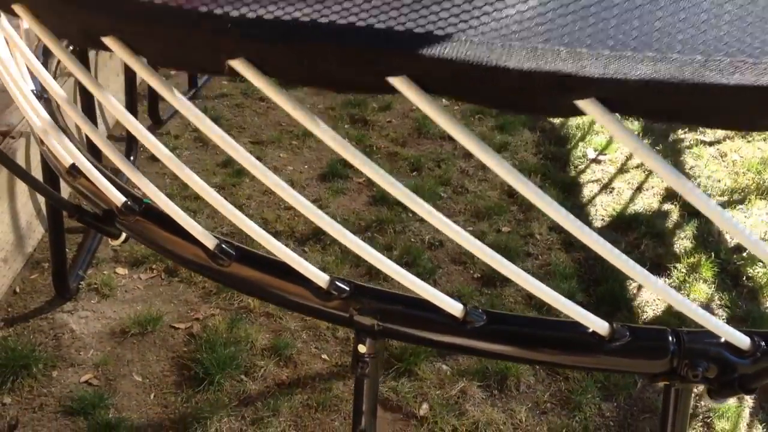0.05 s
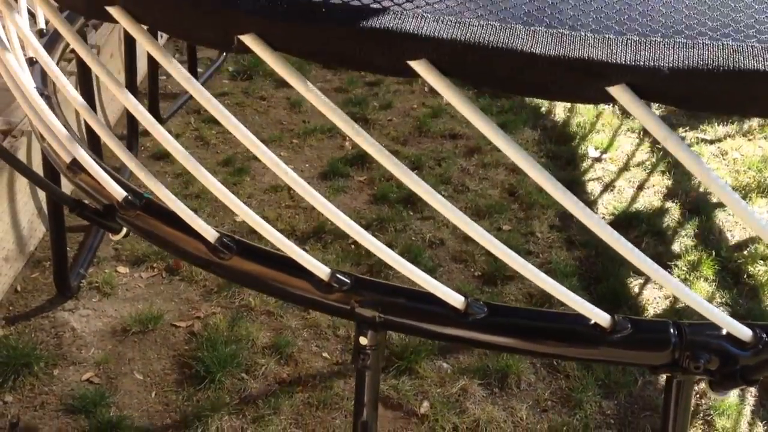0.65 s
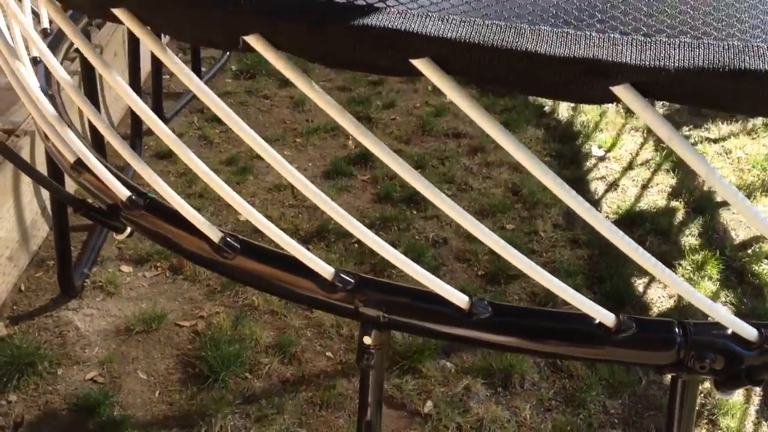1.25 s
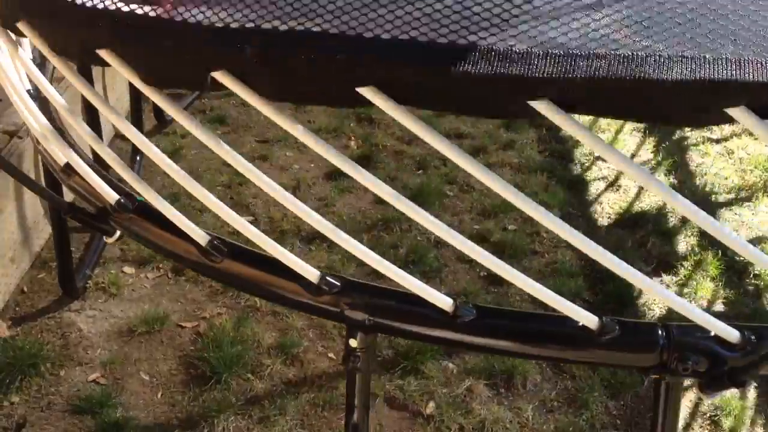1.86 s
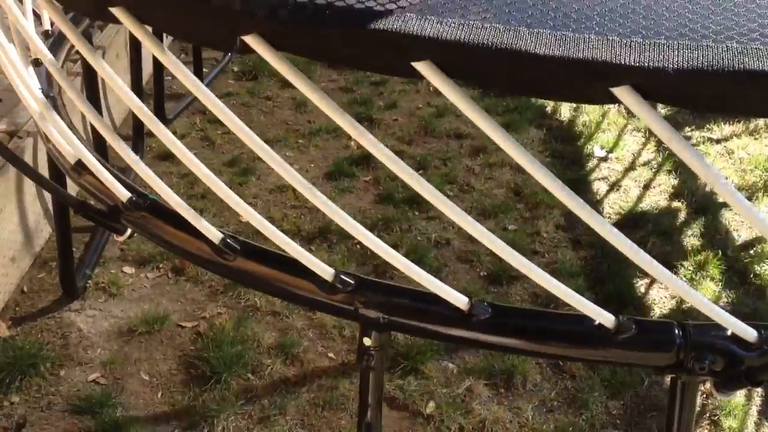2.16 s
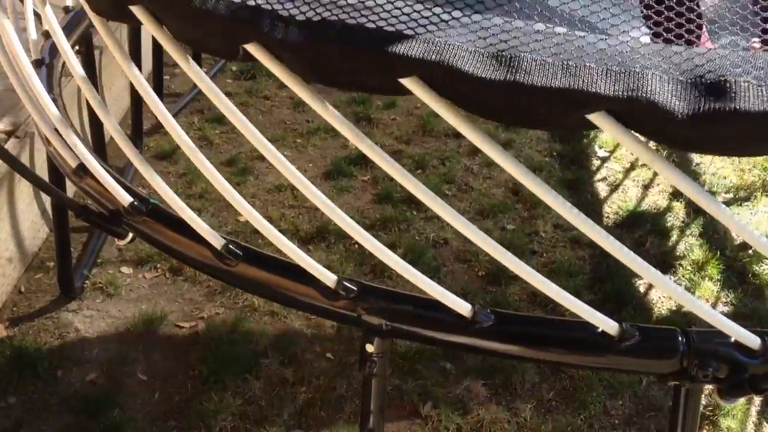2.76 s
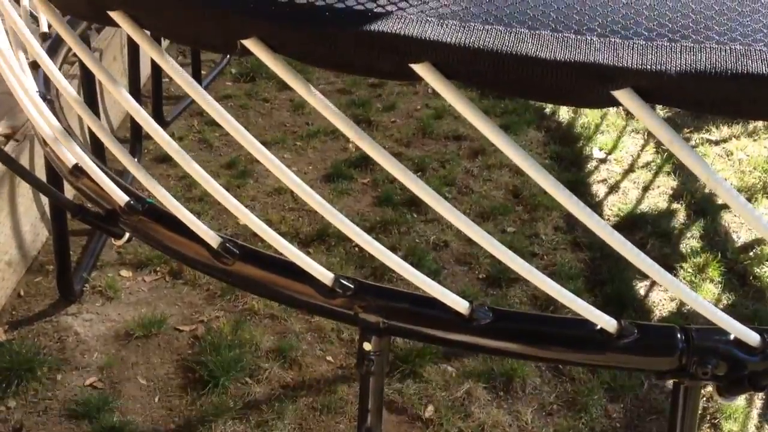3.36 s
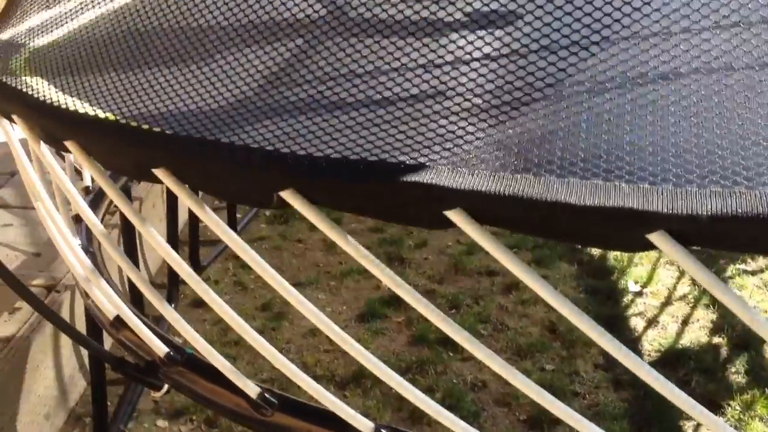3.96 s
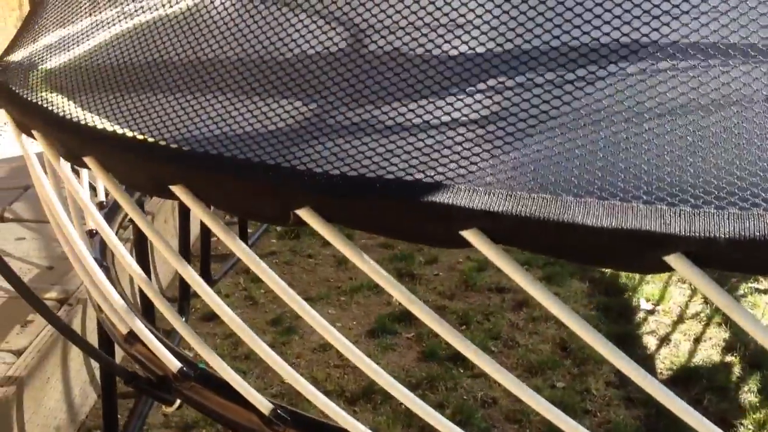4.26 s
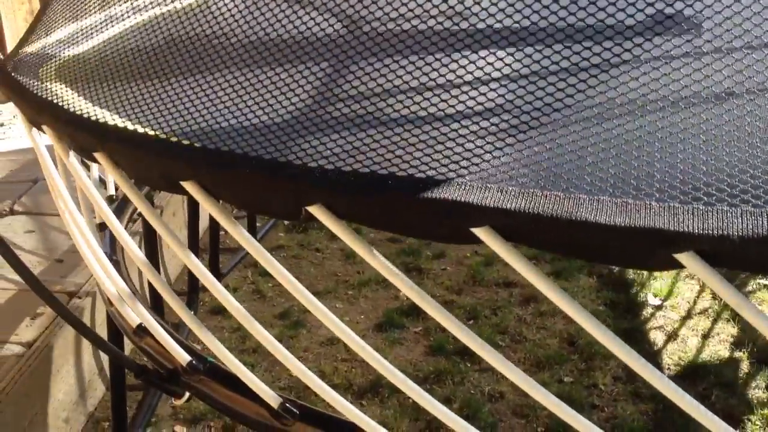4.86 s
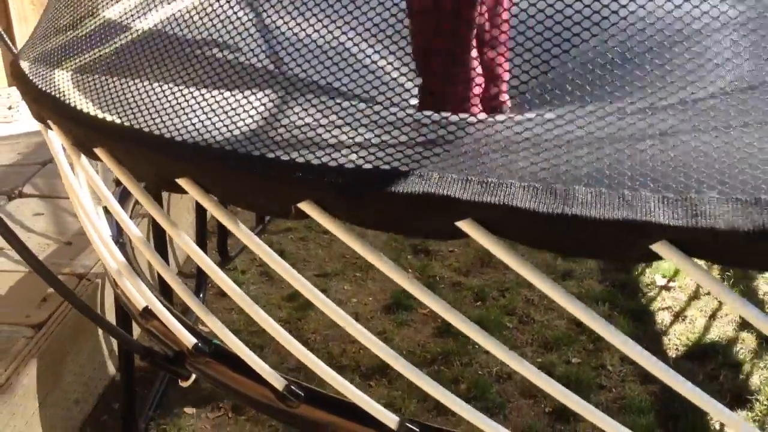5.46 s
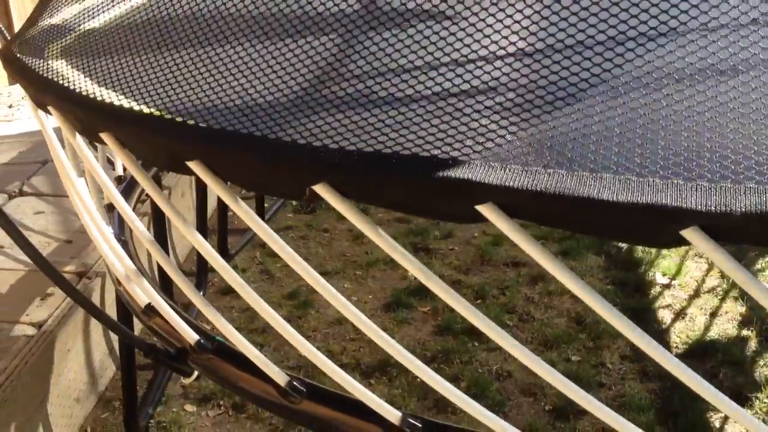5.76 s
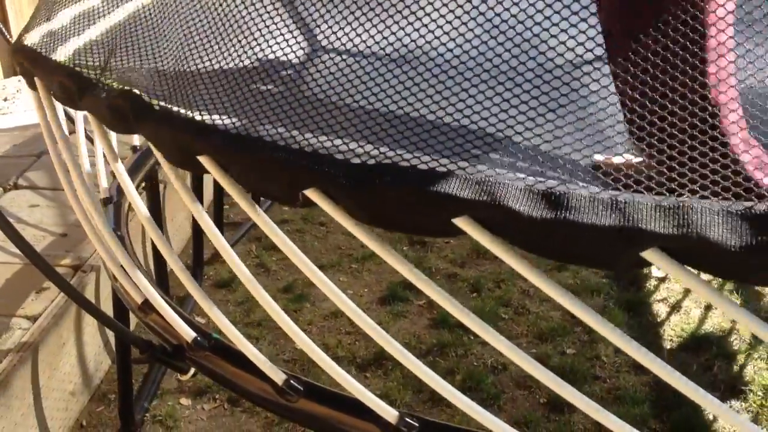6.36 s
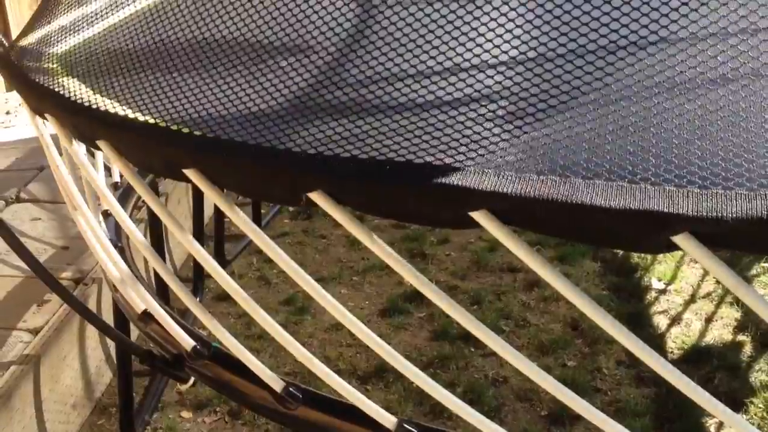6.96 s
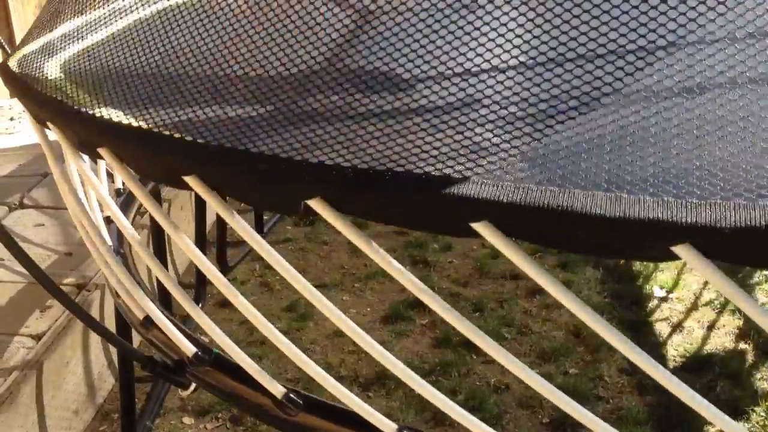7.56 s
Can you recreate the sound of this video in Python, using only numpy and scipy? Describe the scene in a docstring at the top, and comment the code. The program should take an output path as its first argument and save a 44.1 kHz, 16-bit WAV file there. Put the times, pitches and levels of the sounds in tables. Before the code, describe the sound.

Someone bounces on a backyard trampoline, with dull thuds, swishing mat and sharp metallic clanks from the frame, while faint birds chirp.

```python
"""A back yard, beside a rod-sprung trampoline on which someone bounces. Each landing thuds and
stretches the mat, whose fibres swish by friction and whose edge creaks by stick-slip. A loose joint
excites the modes of the steel frame, clanking as the load comes on and again as it lifts. The rods
tick, knock and squeak in their sockets. Small birds sing far off, over a hush and a fan's drone."""
import sys
import numpy as np
from scipy import signal
from scipy.fft import rfft, irfft
from scipy.io import wavfile

SR = 44100
rng = np.random.default_rng(int(sys.argv[2]) if len(sys.argv) > 2 else 0)


def transcribe(u):
    """Save the signal u as a 16-bit wav file named by the first command-line argument.

    u: samples, shape (n,) or (channels, n), limited to [-1, 1]; the rate is SR.
    q: integer samples, one column per channel.
    """
    v = np.clip(np.atleast_2d(u).T, -1, 1)
    q = np.round(v * 32767).astype(np.int16)
    wavfile.write(sys.argv[1], SR, q)


N = 335601
T = np.arange(SR // 2) / SR  # time in seconds within one impact

# The bounces. Each row: landing, time on the mat and time for the cloth to tighten, all in seconds,
# then the levels in dB of thump, slap, swish of the weave and rustle of the edge.
BOUNCES = [(0.063, 0.43, 0.0048, -43, -50.5, -53.5, -58), (0.812, 0.52, 0.055, -56.5, -58.5, -59.5, -64),
           (1.755, 0.44, 0.006, -44, -51, -53, -58), (2.555, 0.48, 0.011, -50.5, -55, -58.5, -68),
           (3.5, 0.48, 0.23, -45, -56, -53, -59), (4.274, 0.53, 0.034, -59, -62.5, -62.5, -63),
           (5.198, 0.49, 0.23, -59, -62.5, -58.5, -60.5), (6.155, 0.52, 0.034, -51.5, -56, -61, -62.5),
           (7.111, 0.5, 0.043, -52, -57, -55, -57.5)]


def amp(db):
    return 10 ** (np.asarray(db) / 20)


def unit_rms(x):
    return x / np.sqrt(np.mean(x ** 2) + 1e-20)


def add(mix, start, sound):
    part = mix[round(start * SR):][:len(sound)]
    part += sound[:len(part)]


def coloured(x, points):
    """Spectral shaping by a curve of (Hz, dB) points, scaled to unit rms."""
    hz, db = np.transpose(points)
    bins_hz = np.fft.rfftfreq(len(x), 1 / SR)
    gain = amp(np.interp(np.log(bins_hz + 1), np.log(hz), db))
    return unit_rms(irfft(rfft(x) * gain, len(x)))


def band(x, lo, hi, order=3):
    return signal.sosfilt(signal.butter(order, [lo, hi], "band", fs=SR, output="sos"), x)


def drift(n, per_s):
    """Random modulation: straight lines between Gaussian values."""
    knots = rng.standard_normal(4096)
    return np.interp(np.arange(n) * per_s / SR % 4095, np.arange(4096), knots)


def by_band(x, bands, levels_db):
    """A filter bank sets the level of an impact's first 25 ms in each band."""
    parts = [band(x, lo, hi) for lo, hi in bands]
    return sum(amp(db) * part / np.std(part[:SR // 40]) for part, db in zip(parts, levels_db))


def burst(rise, t60):
    """An attack, then exponential decay by 60 dB in t60 seconds."""
    return np.minimum(T / rise, 1) ** 0.65 * amp(-60 * np.maximum(T - rise, 0) / t60)


def ringing(modes, rise, scatter_db):
    """Superposition of damped modes; each blow shares its force among them differently."""
    chance = rng.standard_normal((len(modes), 2))
    return sum(amp(db + scatter_db * share) * burst(rise, t60) * np.sin(2 * np.pi * hz * T) * np.sign(side)
               for (hz, db, t60), (share, side) in zip(modes, chance))


def yard(hush_db=-67.5, drone_db=-68):
    """Broadband outdoor noise swells a little; a far-off fan adds a narrow-band drone."""
    # Spectrum of the hush. Each row: frequency in Hz, relative level in dB.
    spectrum = [(15, -75), (25, -52), (101, -14.5), (129, -11.5), (204, -14.5), (233, -1.5), (260, -7.5),
                (445, -18), (1080, -15.5), (1570, -35), (1710, -31.5), (4500, -27), (5580, -38),
                (7700, -39), (15500, -41)]
    hush = coloured(rng.standard_normal(N), spectrum) * amp(hush_db + 0.7 * drift(N, 2.7))
    drone = unit_rms(band(rng.standard_normal(N), 225, 247, order=2))
    return hush + amp(drone_db) * drone


def thuds():
    """Feet strike a heavily damped membrane: a slower push lasts longer, with a little scuff on top."""
    # Short dull thuds: a second foot, the load shifting, or the sharp start of a landing.
    # Each row: start in seconds, level in dB.
    short_thuds = [(0.129, -47), (0.363, -46), (0.871, -60.5), (0.906, -62), (1.797, -41.5), (1.827, -48),
                   (2.064, -42.5), (3.523, -52), (3.555, -58), (3.837, -43.5), (4.425, -51), (5.238, -67),
                   (5.534, -47.5), (6.204, -60), (6.426, -56.5), (7.114, -52.5)]
    # Bands of thump, slap and scuff. Each row: lower and upper edge in Hz.
    bands = [(120, 350), (350, 1100), (1100, 3500)]
    landings = [(start, 0.011, thump, slap, slap - 2.5) for start, _, _, thump, slap, _, _ in BOUNCES]
    short = [(start, 0.0052, db, db - 7.5, db - 13) for start, db in short_thuds]
    out = np.zeros(N)
    for start, rise, *levels_db in landings + short:
        push, scuff = rng.standard_normal((2, len(T)))
        push = coloured(push, [(40, -16), (200, 14), (700, 2), (2000, -9), (8000, -74)])
        blow = push * burst(rise, t60=12 * rise) + amp(-7) * scuff * burst(rise, t60=0.46)
        add(out, start, by_band(blow, bands, levels_db))
    return out


def stretching(slack=0.38, release_share=0.13, creep=0.14, settle_s=0.064):
    """Envelopes of swish and rustle: a mass on a spring sinks and lifts in half a sine each bounce."""
    swish, rustle = np.zeros((2, N))
    for start, length, tighten, _, _, swish_db, rustle_db in BOUNCES:
        t = np.arange(int(length * SR)) / SR
        phase = np.pi * (t / length) ** 0.99
        depth, speed = np.sin(phase), abs(np.cos(phase))
        taut = slack + (1 - slack) * np.minimum(t / tighten, 1)
        contact = taut * np.minimum((1 - t / length) / release_share, 1)
        crumple = 1 + np.exp(-t / 0.015)  # strongest on landing
        add(swish, start, amp(swish_db) * taut * depth ** 0.67 * (creep + speed))
        add(rustle, start, amp(rustle_db) * contact * crumple)
    pole = np.exp(-1 / (settle_s * SR))  # the cloth comes to rest gradually
    return [np.maximum(level, signal.lfilter([1 - pole], [1, -pole], level)) for level in (swish, rustle)]


def mat(swish, rustle, rest_swish_db=-76, rest_rustle_db=-67.5):
    """Friction noise: fibres slide and the padded edge crumples; even the empty mat stirs faintly."""
    # Spectra of the weave and of the edge. Each row: frequency in Hz, relative level in dB.
    weave_spectrum = [(900, -13), (2200, -1.5), (3200, -1), (4700, 2), (6300, -0.5), (10400, -3.5),
                      (15000, -12.5)]
    edge_spectrum = [(40, -44), (90, -13.5), (150, 11.5), (300, 3.5), (700, 0.5), (1200, -3), (2200, -5),
                     (4000, -17.5), (9000, -17.5)]
    catching = amp(1.8 * drift(N, 45))
    weave = coloured(rng.standard_normal(N) * amp(3 * drift(N, 2500)), weave_spectrum)
    edge = coloured(rng.standard_normal(N) * amp(3 * drift(N, 70)), edge_spectrum)
    weave *= np.hypot(swish * catching, amp(rest_swish_db))
    edge *= np.hypot(rustle * catching, amp(rest_rustle_db))
    return weave + edge


def impulses(per_s):
    """A Poisson train of impulses of uneven strength."""
    return (rng.random(N) < per_s / SR) * amp(4 * np.minimum(rng.exponential(1, N), 3))


def crackle(swish):
    """Fibres and rod ends snap in tiny broadband transients, whose strength follows the swish."""
    snaps = impulses(per_s=45) * swish
    snap = band(rng.standard_normal(len(T)), 1300, 9200, order=1) * burst(0.00039, t60=0.0049)
    return amp(-1) * signal.oaconvolve(snaps, snap)[:N]


def webbing(rustle, slips_per_s=200, pitches=8, decay_cycles=3):
    """Clumps of tiny slips in the edge webbing each excite a damped, woody resonance."""
    clumps = amp(6 * np.clip(drift(N, 45), -2, 1))
    t = T[:SR // 100]
    out = np.zeros(N)
    for hz in np.geomspace(900, 3000, pitches):
        grain = np.sin(2 * np.pi * hz * t) * np.exp(-t * hz / decay_cycles)
        out += signal.oaconvolve(impulses(slips_per_s / pitches), grain)[:N]
    return amp(-7) * unit_rms(out * clumps) * rustle


def low_bumps():
    """Soft bass bumps, like handling noise: quickly damped bursts in a low band."""
    # Each row: start in seconds, level in dB.
    bumps = [(.07, -56), (1.765, -61), (3.858, -62), (4.471, -66), (6.019, -63), (6.164, -67), (6.27, -70)]
    out = np.zeros(N)
    for start, db in bumps:
        impact = rng.standard_normal(len(T)) * burst(0.0051, t60=0.09)
        add(out, start, by_band(impact, [(60, 210)], [db]))
    return out


def singing_tube(modes, rise, sustain, rattles_per_s=130):
    """Close, lightly damped modes beat, modulated in amplitude and phase by rods rattling on the tube."""
    out = np.zeros(len(T))
    for hz, db, t60 in modes:
        envelope = amp(db) * burst(rise, t60 * sustain) * (1 + 0.4 * drift(len(T), rattles_per_s))
        phase = 2 * np.pi * (hz * T + rng.random()) + 0.35 * drift(len(T), rattles_per_s)
        out += envelope * np.sin(phase)
    return out


def clanks(sway_hz=197, grind_lead_s=0.002058):
    """A loose joint slips in a run of uneven contacts, and the steel frame rings in free vibration."""
    # Slips of the joint. Each row: start and rise in seconds; hoop, clack and favoured note in Hz;
    # a factor on the singing's decay time; singing level in dB; then six band levels in dB.
    slips = [(0.136, 0.0057, 249, 1650, 5400, 1.1, -51.5, -41.5, -60, -46, -34, -38.5, -43),
             (.380, 0.0012, 264, 1260, 4790, 0.72, -58.5, -44.5, -37, -35.5, -34.5, -43, -51),
             (1.840, 0.0063, 234, 990, 4810, 1, -60, -47, -62, -47, -38, -42.5, -51),
             (2.084, 0.0039, 232, 2553, 5560, 0.72, -52, -32, -41, -37.5, -35, -41.5, -61),
             (3.643, 0.0094, 256, 2520, 5380, 1.3, -63, -55, -59, -56, -45.5, -56, -62),
             (3.858, 0.0037, 199, 568, 4660, 0.94, -52, -34.5, -40.5, -41, -33, -37, -53),
             (5.387, 0.0054, 259, 2530, 5310, 0.49, -54.5, -53.5, -59.5, -53.5, -45.5, -54, -65),
             (5.555, 0.0069, 207, 2530, 5400, 0.65, -54, -39, -47, -47, -42, -54.5, -64),
             (7.225, 0.0096, 275, 2230, 5400, 1.2, -62, -56, -74, -55.5, -45, -49, -57),
             (7.468, 0.0041, 204, 1306, 4700, 1.1, -53, -33, -40.5, -35.5, -34, -37, -39)]
    # Bands of boom, hollow, clack, ring, clatter and sheen. Each row: lower and upper edge in Hz.
    bands = [(110, 350), (350, 1050), (1050, 3500), (3500, 7000), (7000, 10500), (10500, 15500)]
    # Short modes of the frame and long ones of the tube. Each row: frequency in Hz, relative level
    # in dB, nominal t60 in seconds.
    frame_modes = [(135, -10, .14), (275, -9, .08), (378, -4.5, .13), (420, -7, .11), (555, -6, .14),
                   (605, -2, .09), (740, -9, .08), (810, -6, .09), (880, -9, .07), (1010, -7, .07),
                   (1115, -9, .09), (1235, -6, .07), (1324, -8, .08), (1590, -6, .06), (1809, -1.5, .11),
                   (2126, -8, .1), (2300, -5, .06), (2470, -3, .06), (2525, -2, .1), (2955, -13, .09),
                   (3240, -12, .09), (3505, -14, .06), (4468, -4, .06), (4683, -2, .07), (4772, 0, .07),
                   (5464, -3, .06), (6120, -8, .05), (6250, -5, .06), (6790, -11, .05), (7320, -12, .05),
                   (7982, -5, .05), (8390, -8, .05), (8660, -8, .05), (9850, -9, .035), (11030, -12, .05)]
    tube_modes = [(5329, 0, .52), (5373, 1, .56), (5432, -8, .35), (5464, -2, .42), (5626, -11, .3),
                  (4468, -14, .3), (4683, -7, .33), (4772, -6, .33), (6245, -14, .3), (6770, -15, .3),
                  (2526, -15, .25), (3240, -17, .22), (1809, -15, .2), (8390, -17, .22)]
    # Spectrum of the steel's dense modes. Each row: frequency in Hz, relative level in dB.
    steel_spectrum = [(100, -6), (600, -1), (960, -3), (1400, -5), (2300, -1), (3200, -6), (4100, -3),
                      (4700, 5), (5100, -1), (5450, 4), (6250, 2), (7100, -3), (9800, -2.5), (10400, -10),
                      (15000, -9)]
    out = np.zeros(N)
    for start, rise, hoop_hz, clack_hz, favoured_hz, sustain, sing_db, *levels_db in slips:
        contacts = coloured(rng.standard_normal(len(T)) * amp(4 * drift(len(T), 1100)), steel_spectrum)
        chatter = amp(1) * burst(rise, t60=0.075 + 6 * rise)  # a slower slip chatters longer
        shake = amp(-10.5) * burst(rise, t60=0.25)
        # the hoop jerks at a pitch set by the load, then sways on at its own
        hoop = np.sin(2 * np.pi * hoop_hz * T) * (amp(8) * burst(rise, 0.037) + amp(-3) * burst(rise, 0.14))
        hoop += amp(-7) * np.sin(2 * np.pi * sway_hz * T) * burst(rise, 0.32)
        detune = 1 + 0.0028 * rng.standard_normal()  # strain shifts the frame's modes
        modes = [(hz * detune, db, t60) for hz, db, t60 in frame_modes] + [(clack_hz, 1.5, 0.08)]
        ring = ringing(modes, rise, scatter_db=2.5)
        add(out, start, by_band(contacts * (chatter + shake) + hoop + ring, bands, levels_db))
        favoured = (favoured_hz, 3, 0.2)  # the point of contact makes one note stand out
        add(out, start, amp(sing_db) * singing_tube(tube_modes + [favoured], rise, sustain))
        # the joint starts to grind just before it lets go, 3 dB above the clack band
        grind = unit_rms(band(rng.standard_normal(len(T)), 520, 3700, order=2))
        add(out, start - grind_lead_s, amp(levels_db[2] + 3) * grind * burst(grind_lead_s, t60=0.096))
    return out


def groans(jitter=0.07):
    """Rough harmonic groans: stick-slip creaks of the mat's edge, and one faint distant call at 5.86 s."""
    # Each row: start and length in seconds, first and last pitch in Hz, level in dB,
    # noise relative to tone in dB.
    events = [(0.211, 0.047, 275, 340, -55.5, 10), (0.272, 0.024, 341, 400, -56.5, -5),
              (0.312, 0.014, 350, 330, -64, -12), (.802, 0.028, 418, 520, -58, 6),
              (1.905, 0.033, 339, 298, -54.5, 4), (2.702, 0.046, 1126, 1175, -59, -1),
              (2.728, 0.041, 1170, 1250, -59, -1), (2.886, 0.036, 610, 580, -67, 8),
              (2.96, 0.049, 542, 448, -59.5, 2), (3.747, 0.048, 309, 373, -58.5, 9),
              (3.783, 0.025, 390, 360, -56, -9), (4.645, 0.028, 760, 680, -61, 16),
              (5.857, 0.059, 1054, 1020, -67.5, 6), (6.405, 0.054, 349, 306, -58.5, 4),
              (7.312, 0.017, 360, 348, -56, -8), (7.321, 0.033, 363, 457, -47, 4.5),
              (7.347, 0.027, 340, 323, -48.5, -4)]
    # Harmonics of the pitch: relative levels in dB, from the fundamental up.
    harmonics = [-9, 0, -9, -15]
    out = np.zeros(N)
    for start, length, first_hz, last_hz, db, noise_db in events:
        n = int(length * SR)
        hz = np.linspace(first_hz, last_hz, n) * (1 + jitter * drift(n, 500))
        phase = 2 * np.pi * np.cumsum(hz) / SR
        tone = unit_rms(sum(amp(level) * np.sin(k * phase) for k, level in enumerate(harmonics, 1)))
        noise = unit_rms(band(rng.standard_normal(n), first_hz * 0.63, first_hz * 3.06, order=2))
        envelope = amp(3 * drift(n, 160)) * signal.windows.tukey(n, 0.7)
        add(out, start, amp(db) * unit_rms((tone + amp(noise_db) * noise) * envelope))
    return out


def whistles(notes, waver, swell_db=6):
    """Frequency modulation: each bird note glides through three pitches, wavering and swelling."""
    out = np.zeros(N)
    for start, length, *pitches, db in notes:
        progress = np.linspace(0, 1, int(length * SR))
        glide = np.polyval(np.polyfit([0, 0.5, 1], pitches, 2), progress)
        hz = glide * (1 + waver * drift(len(progress), 1100))
        envelope = signal.windows.tukey(len(progress), 0.4) * amp(swell_db * progress)
        add(out, start, amp(db) * unit_rms(np.sin(2 * np.pi * np.cumsum(hz) / SR) * envelope))
    return out


def bird_calls():
    """Single calls, each a nearly pure tone on a curved glide."""
    # Calls. Each row: start and length in seconds, middle pitch in Hz, fall and upturn of both ends
    # in octaves, source level in dB.
    calls = [(0.729, .055, 6260, 0.17, -0.032, -62), (0.902, 0.12, 7730, 0.059, 0.41, -48.5),
             (1.413, 0.051, 5800, 0.3, 0.049, -55.5), (1.563, 0.0464, 5530, 0.19, 0.068, -56.5),
             (6.617, 0.13, 8080, -0.046, 0.24, -52.5)]
    notes = [(start, length, hz * 2 ** (upturn + fall / 2), hz, hz * 2 ** (upturn - fall / 2), db)
             for start, length, hz, fall, upturn, db in calls]
    return whistles(notes, waver=0.03)


def sockets():
    """Friction at the rod ends: turning in their sockets, they snap and squeak."""
    # Ticks. Each row: start in seconds, level in dB, centre frequency in Hz.
    ticks = [(.822, -53.5, 3000), (.853, -59, 8000), (1.281, -50, 5030), (1.323, -53, 7900),
             (1.336, -51.5, 7900), (1.914, -47, 8500), (2.4, -59.5, 6700), (2.424, -61, 10100),
             (2.741, -49.5, 9000), (2.893, -52, 4130), (2.974, -45, 7800), (2.981, -54, 7950),
             (2.9934, -56, 7220), (3.0523, -52, 6500), (3.52, -53.5, 7360), (4.444, -44.5, 9700),
             (4.503, -50.5, 10000), (4.7498, -45.5, 9100), (4.8135, -51.5, 10800), (4.978, -65, 6700),
             (5.238, -53.5, 2980), (5.449, -53, 7000), (6.177, -54, 4200), (6.603, -44.5, 7700),
             (7.338, -48, 7960)]
    # Squeaks. Each row: start and length in seconds, pitch in Hz, level in dB, jitter as a share of pitch.
    squeaks = [(2.712, .035, 13750, -59, .006), (4.462, .032, 13750, -59, .006),
               (5.403, .02, 14100, -57, .012)]
    out = np.zeros(N)
    snap_and_tail = burst(0.00018, t60=0.006) + amp(-13) * burst(0.00033, t60=0.18)
    for start, db, hz in ticks:
        noise = unit_rms(band(rng.standard_normal(len(T)), hz / 1.47, hz * 1.28, order=1))
        add(out, start, amp(db + 1) * noise * snap_and_tail)
    for start, length, hz, db, jitter in squeaks:
        n = int(length * SR)
        phase = 2 * np.pi * np.cumsum(hz * (1 + jitter * drift(n, 1500))) / SR
        add(out, start, amp(db) * unit_rms(np.sin(phase) * signal.windows.tukey(n, 0.6)))
    return out


def rod_knocks():
    """A rod strikes its seat and excites strongly damped modes: a hollow, woody knock."""
    # Knocks. Each row: start in seconds, level in dB, a size that divides the mode frequencies.
    knocks = [(1.798, -41, 1.17), (3.053, -53, 1.3), (5.461, -28, 1.04), (5.467, -40, 0.86),
              (6.165, -49.5, 1.41), (6.432, -50, 1.27), (7.422, -45.5, 1.1)]
    # Modes at size 1. Each row: frequency in Hz, relative level in dB, t60 in seconds.
    hollow_modes = [(314, -4, 0.032), (550, -13, 0.03), (715, -6, 0.019), (860, 0, 0.019),
                    (1440, -12, 0.026), (1950, -9, .016), (2600, -15, 0.022)]
    out = np.zeros(N)
    for start, db, size in knocks:
        crack = amp(-12) * rng.standard_normal(len(T)) * burst(0.0005, t60=0.02) / size ** 2
        modes = [(hz / size, mode_db, t60) for hz, mode_db, t60 in hollow_modes]
        ring = ringing(modes, rise=0.0019, scatter_db=0.5)
        add(out, start, amp(db) * band(ring + crack, 104, 4000, order=2))
    return out


def bird_song(start_s=3.183, period_s=0.1635, repeats=7, source_db=-56.5, growth_db_per_s=3):
    """One bird repeats a syllable of three falling glides, growing louder."""
    # Notes of the syllable. Each row: offset and length in seconds; first, middle and last pitch in Hz;
    # relative level in dB.
    syllable = [(-.003, .036, 3750, 3550, 2750, -6), (.069, .045, 5900, 4750, 3800, 0),
                (.113, .062, 6050, 5950, 5400, -11)]
    notes = [(start_s + elapsed + offset, *shape, source_db + growth_db_per_s * elapsed + db)
             for elapsed in period_s * np.arange(repeats) for offset, *shape, db in syllable]
    return whistles(notes, waver=0.026)


def echoes(x, t60, delay, taps_per_s=2000):
    """Convolution with sparse, decaying reflections from house wall, fence and ground."""
    taps = rng.standard_normal(len(T)) * (rng.random(len(T)) < taps_per_s / SR)
    taps *= (T > delay) * amp(-60 * T / t60)
    return signal.oaconvolve(x, taps / np.linalg.norm(taps))[:N]


def scene():
    """Direct-to-reflected ratio conveys distance: the trampoline is close, the birds across the yard."""
    swish, rustle = stretching()
    near = clanks() + thuds() + groans() + low_bumps() + rod_knocks() + sockets()
    near += crackle(swish) + webbing(rustle)
    near += amp(-18) * echoes(near, t60=0.3, delay=0.006)
    song, calls = bird_song(), bird_calls()
    direct = amp(-12.5) * song + amp(-18) * calls
    wall_echo = amp(-7) * np.roll(direct, round(0.025 * SR))
    scattered = echoes(amp(-11.5) * song + amp(-12.5) * calls, t60=0.2, delay=0.002)
    return (near + direct + wall_echo + scattered + mat(swish, rustle) + yard())[None]


def record(dry, cutoff_hz=15550):
    """A linear-phase low-pass filter removes the highest treble."""
    lowpass = signal.firwin(511, cutoff_hz, window=("kaiser", 9), fs=SR)
    return signal.oaconvolve(dry, lowpass[None], "same")


dry = scene()
out = record(dry)
transcribe(out)
```